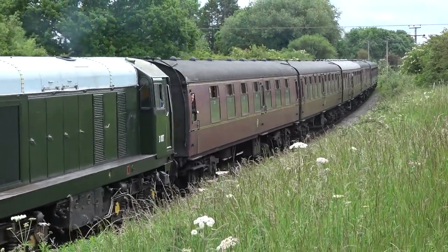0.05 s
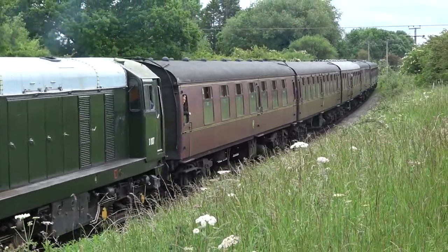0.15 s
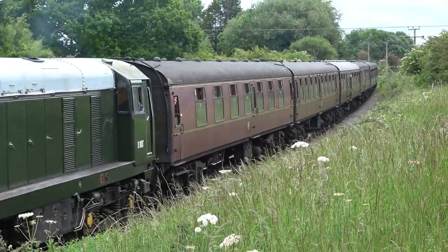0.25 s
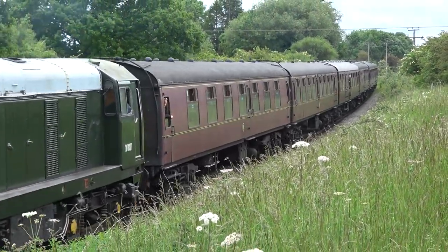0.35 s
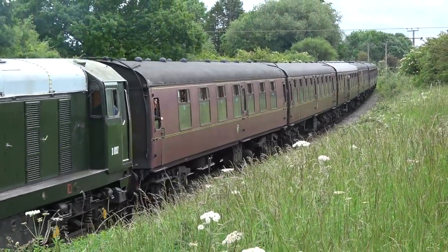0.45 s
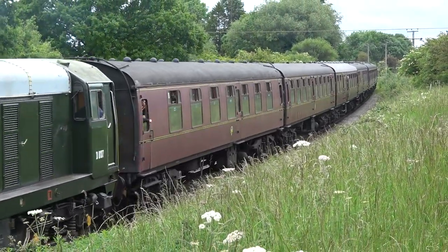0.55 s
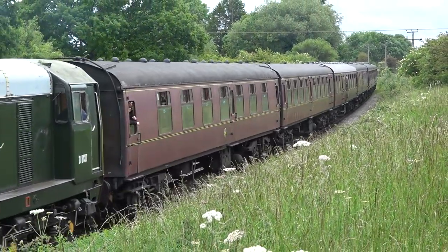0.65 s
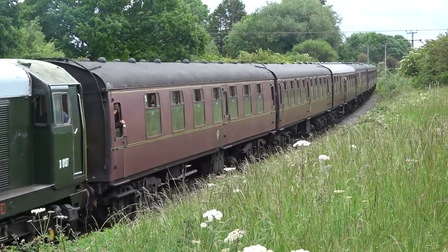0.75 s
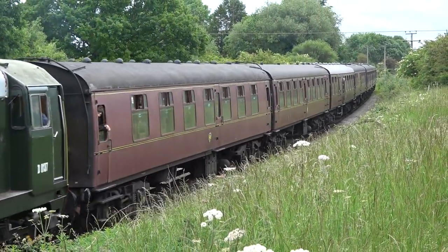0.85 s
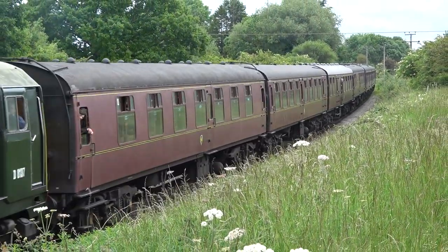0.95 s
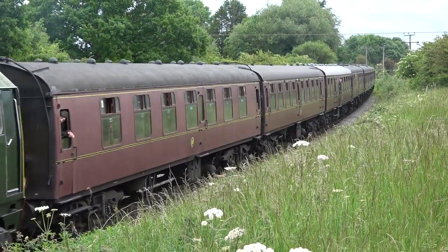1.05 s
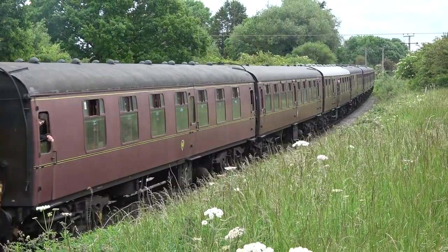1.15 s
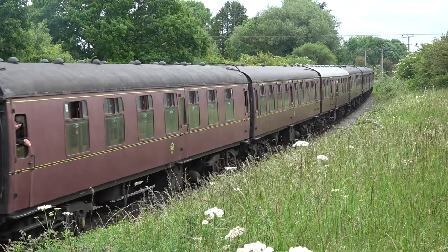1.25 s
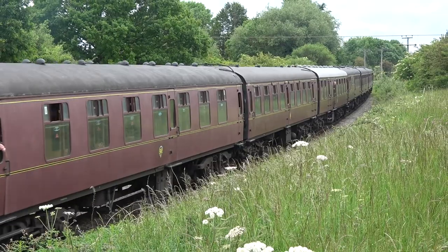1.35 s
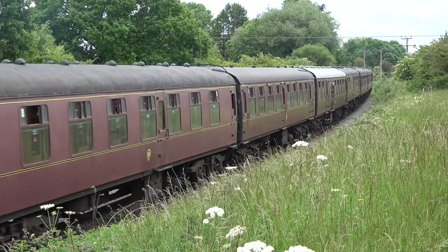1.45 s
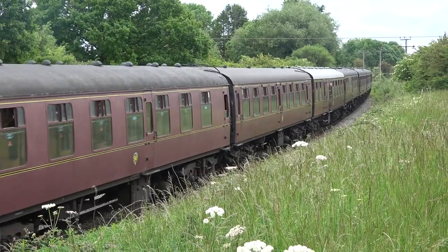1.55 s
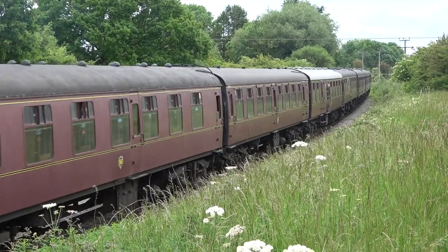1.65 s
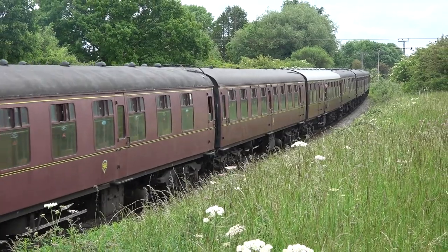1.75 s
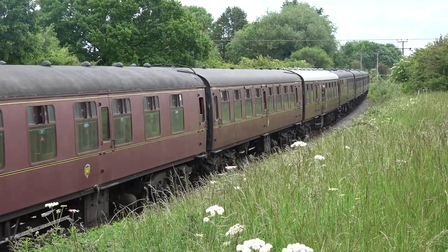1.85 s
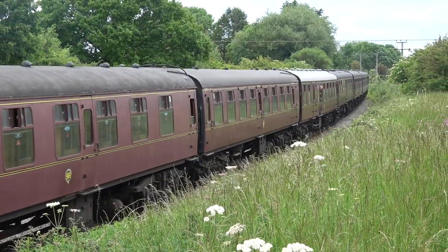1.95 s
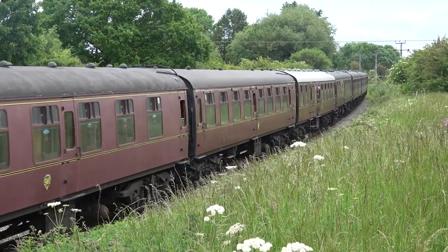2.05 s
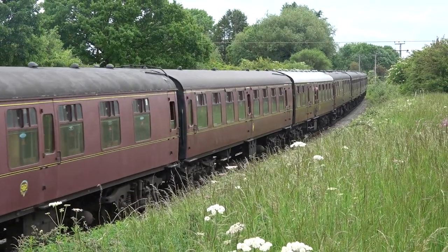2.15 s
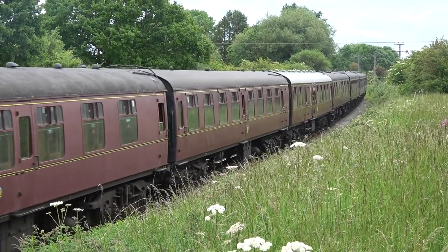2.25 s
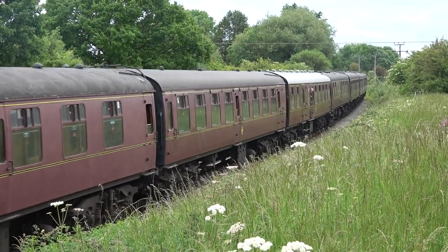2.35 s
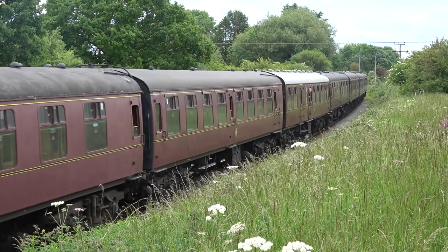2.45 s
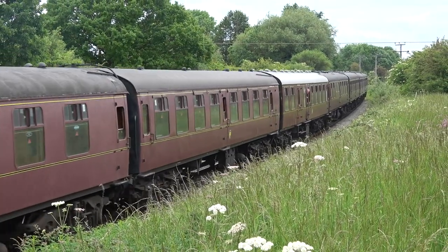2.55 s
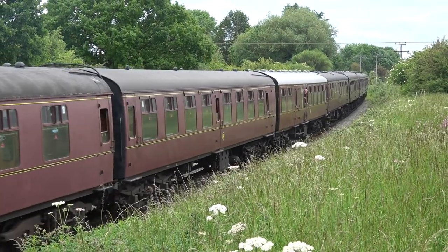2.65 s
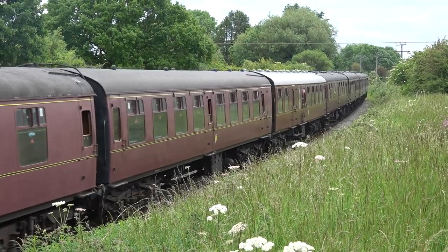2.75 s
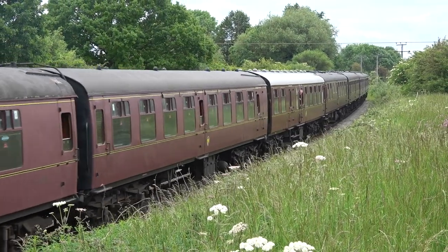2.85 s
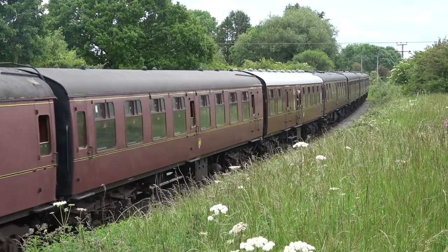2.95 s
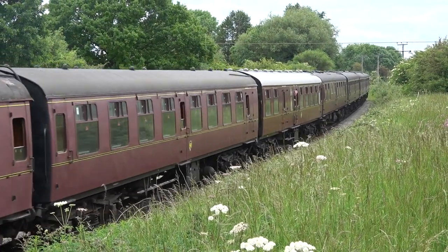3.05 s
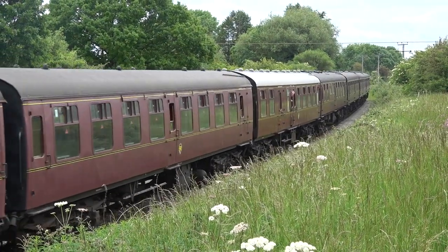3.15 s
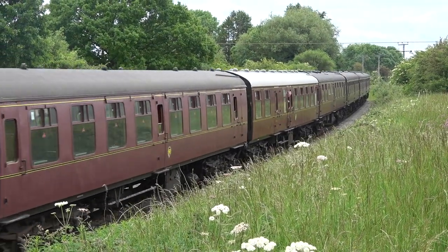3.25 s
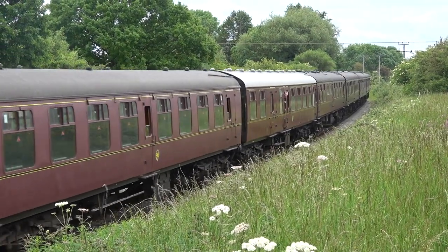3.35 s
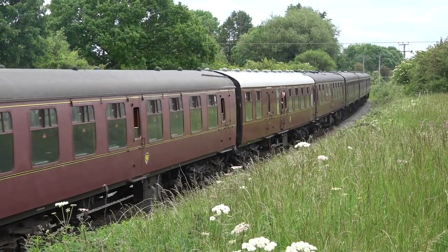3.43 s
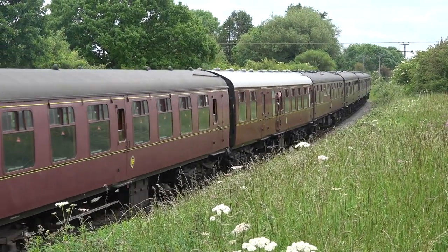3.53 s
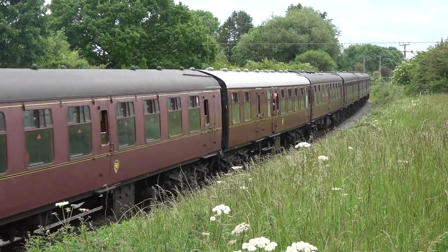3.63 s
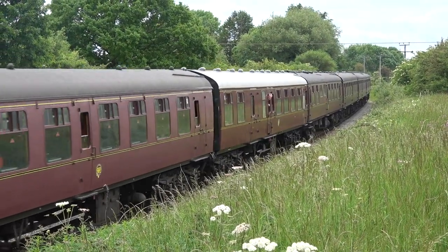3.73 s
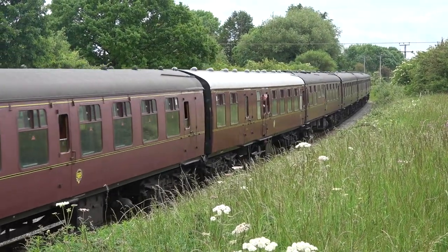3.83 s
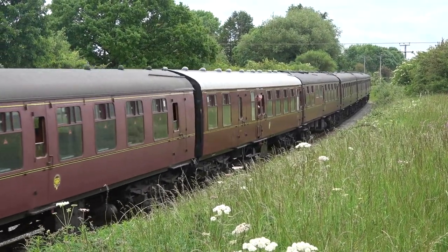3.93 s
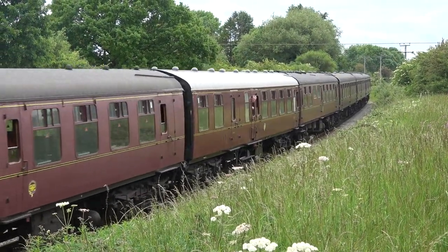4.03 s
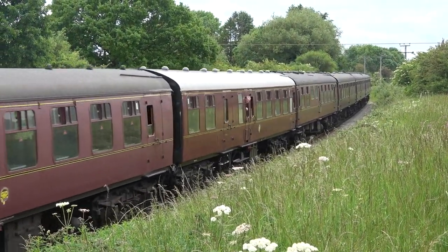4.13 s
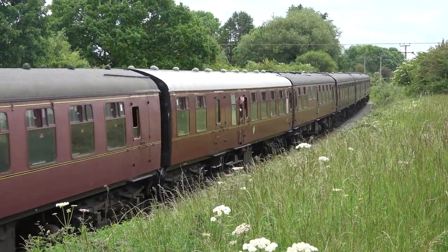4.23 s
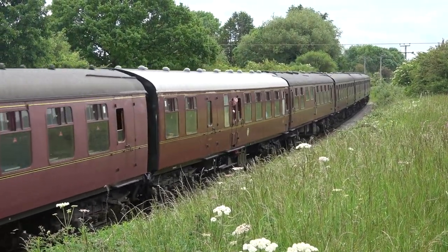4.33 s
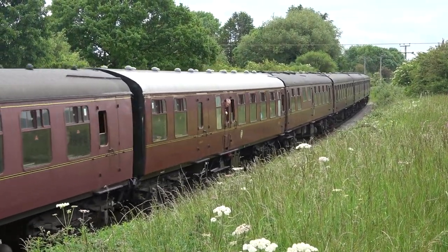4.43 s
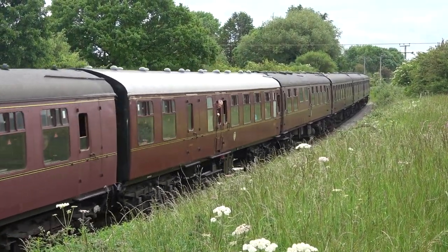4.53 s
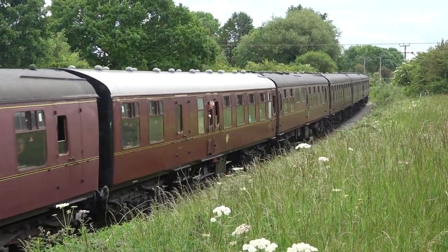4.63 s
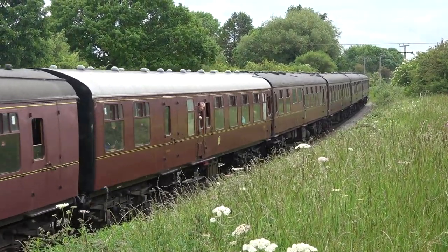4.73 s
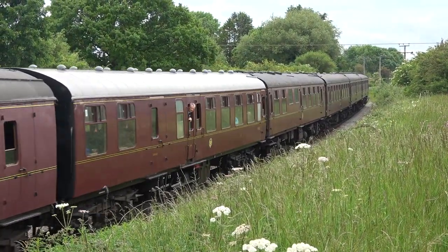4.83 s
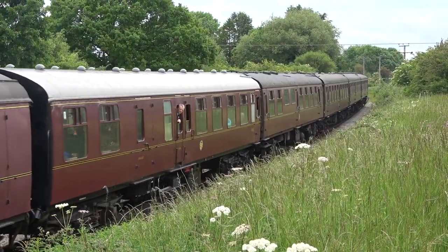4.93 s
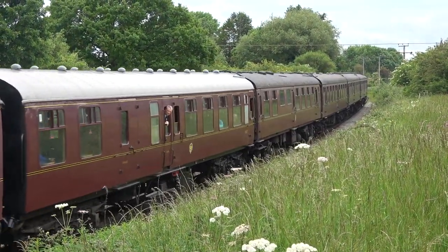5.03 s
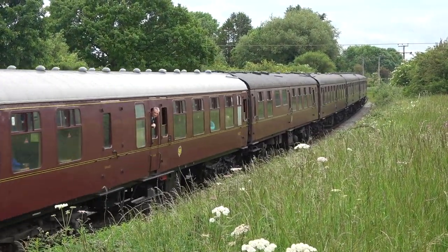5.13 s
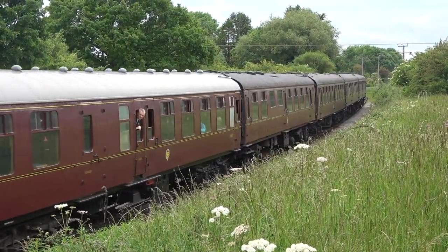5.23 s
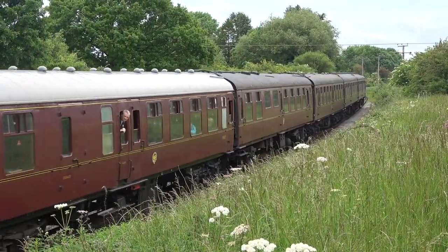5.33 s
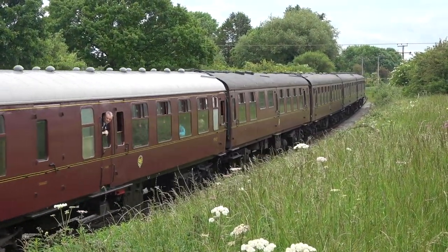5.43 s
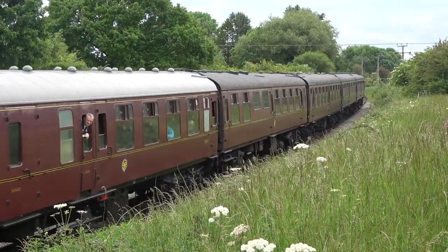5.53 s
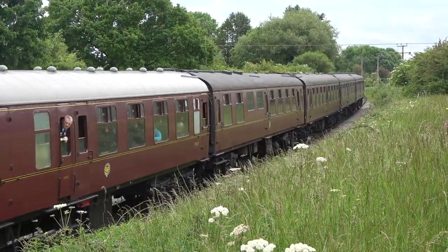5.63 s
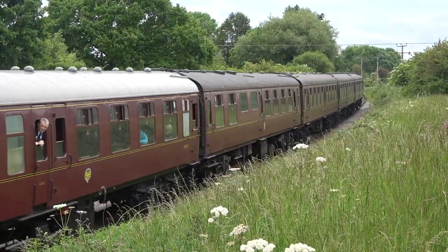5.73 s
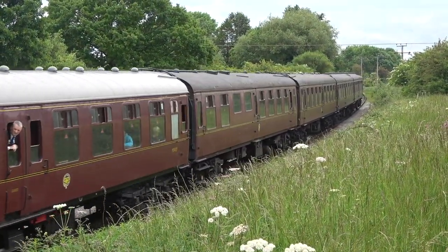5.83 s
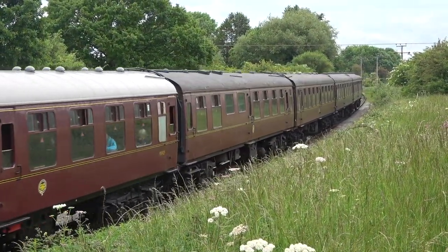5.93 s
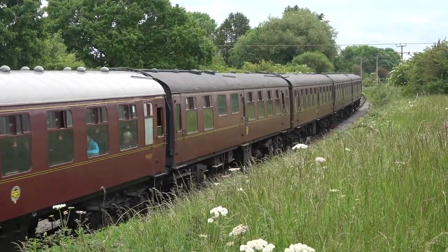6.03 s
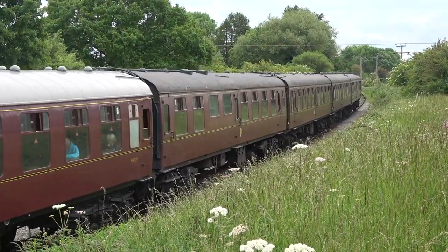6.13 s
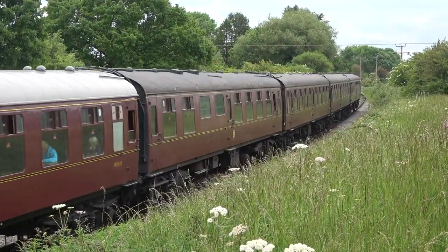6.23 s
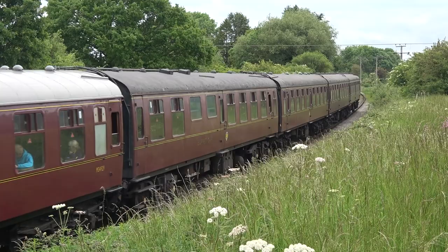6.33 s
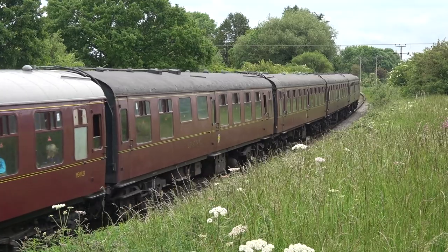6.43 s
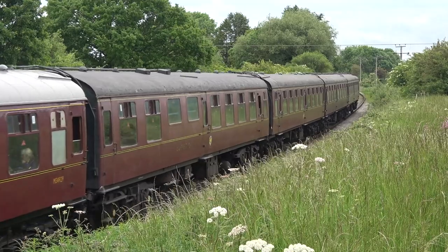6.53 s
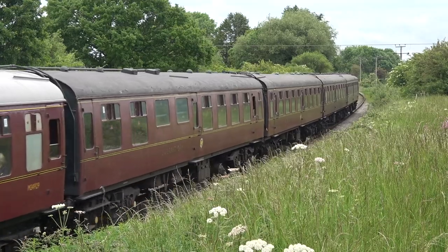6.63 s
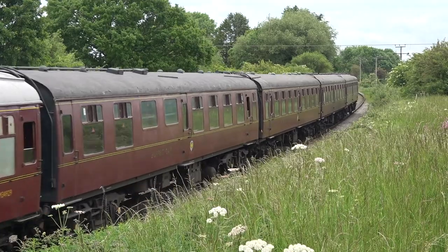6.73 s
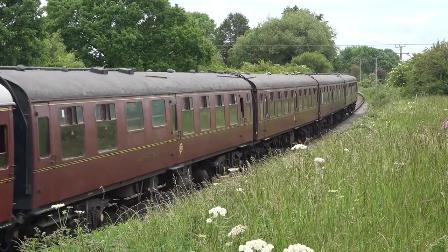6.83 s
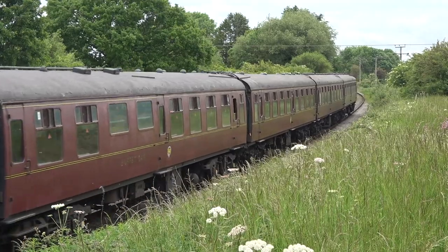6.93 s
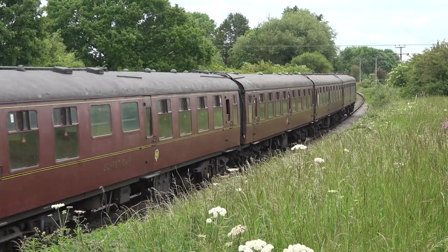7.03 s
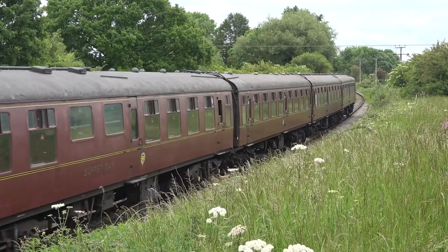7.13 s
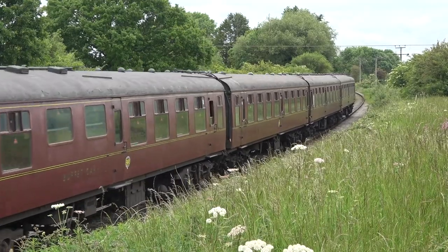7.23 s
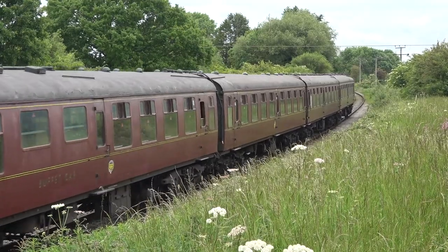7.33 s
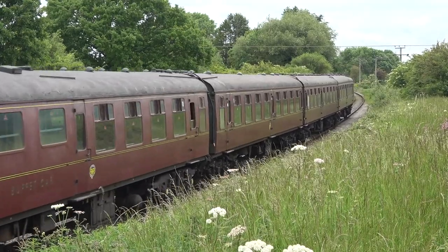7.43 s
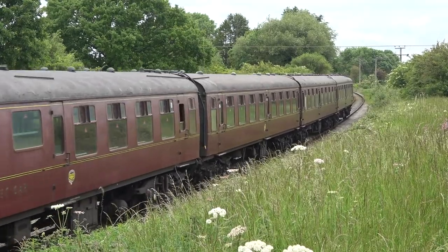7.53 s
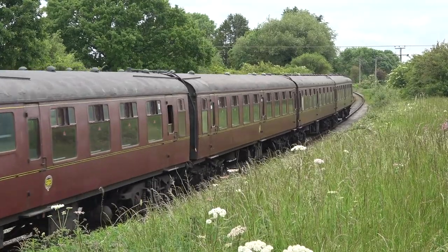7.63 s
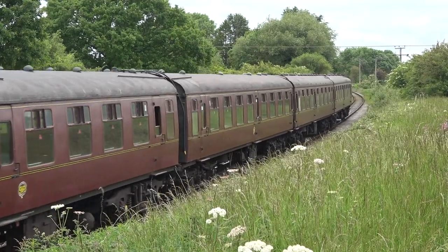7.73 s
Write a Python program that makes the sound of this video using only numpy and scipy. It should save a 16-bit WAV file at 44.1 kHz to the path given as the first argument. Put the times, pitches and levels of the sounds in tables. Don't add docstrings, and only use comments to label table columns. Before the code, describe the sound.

A diesel locomotive thunders past with rapid throbbing exhaust and a rising, fluttering turbo whistle, then fades as coaches clatter over rail joints with flange squeals.

```python
import sys
import numpy as np
from scipy import signal
from scipy.fft import rfft, irfft, next_fast_len
from scipy.io import wavfile
from scipy.ndimage import uniform_filter1d, minimum_filter1d, map_coordinates

SR = 44100
rng = np.random.default_rng(int(sys.argv[2]) if len(sys.argv) > 2 else 0)


def dump(signal):
    limited = np.clip(np.atleast_2d(signal).T, -1, 1)
    pcm = np.round(limited * 32767).astype(np.int16)
    wavfile.write(sys.argv[1], SR, pcm)


def elevation(decibels):
    levels = np.asarray(decibels, float)
    return 10 ** (levels / 20)


N = 342657
T = np.arange(N) / SR

# freq_hz, density_db [Hz, dB per Hz]
RAIL_SPECTRUM = [(13, -71), (22, -38), (54, -9), (141, -9.5), (184, -2), (212, -0.5), (336, -5.5),
                 (378, -9), (613, -26), (1730, -35), (2250, -35), (3310, -33.5), (7000, -56.5), (9100, -87),
                 (15400, -120)]
CLANK_SPECTRUM = [(500, 24.5), (1300, 5.5), (1800, 8.5), (2500, 7.5), (3100, 5), (5000, -5), (9000, -25),
                  (15000, -46)]
SCRAPE_SPECTRUM = [(5760, -32), (9800, -19), (11200, -15), (12100, -4), (12700, 0), (13300, -7),
                   (14200, -13), (15700, -21)]
BITE_SPECTRUM = [(5000, -18), (7000, -3), (9500, -7), (11200, 0), (12200, -1), (13500, -10), (15700, -26)]
BRIGHT_PUFF_SPECTRUM = [(3500, -42), (4500, 13), (7000, 3), (10000, 4), (12000, -19), (15800, -28)]
BLOCK_SPECTRUM = [(13, -47), (22, -6), (38, -37), (60, -11), (117, 1.5), (183, -6.5), (258, -15.5),
                  (375, -24), (600, -23), (780, -45), (1320, -120)]
ROAR_NEAR = [(210, -27), (330, -9), (385, -3), (512, -11), (621, -5.5), (755, -11.5), (943, -9),
             (3400, -14.5), (4400, -36), (7040, -120)]
ROAR_FAR = [(210, -18), (350, -1.5), (382, -1), (705, -11.5), (877, -8.5), (1330, -19), (1710, -12),
            (2400, -30), (3120, -63), (5280, -120)]
HISS_NEAR = [(2000, -34), (2800, 0), (3500, 1.5), (4500, -1), (5500, -3), (6500, -12), (8000, -4)]
HISS_FAR = [(1350, -21), (2300, -46), (2540, -13), (3120, 2.5), (3450, 3), (4770, -3), (5210, -7),
            (6500, -10), (8450, -37), (14300, -120)]
SIZZLE_NEAR = [(4500, -28), (6000, 6), (8500, 8.5), (10000, 2.5), (14000, -1.5), (15800, -9)]
SIZZLE_FAR = [(4500, -11), (6000, 1), (7500, 3), (8700, 12), (10500, 1), (13000, -11.5), (15800, -9)]

# [s, dB]
BOGIE_NEARNESS = [(3.4, -25), (3.53, -27), (3.76, -27), (4.12, -22), (4.45, -23), (4.59, -26), (4.97, -25),
                  (5.1, -27), (5.49, -27), (5.77, -26), (5.97, -22), (6.06, -21), (6.5, -24), (7.32, -27),
                  (7.48, -27), (7.77, -22)]
# [s, ratio]
COUPLINGS = [
    (4.019, 1.0),
    (5.879, 0.985),
    (7.712, 0.97),
]
# [s, dB, Hz]
AXLES = [
    (0, -1.5, 279),
    (0.239, -2, 243.3),
    (0.558, -3, 291),
    (0.797, -3, 323),
]
# [s, dB, Hz]
FAR_KNOCKS = [(3.714, -33, 228), (3.86, -9, 244), (4.17, -23, 253), (4.426, -4, 302), (4.609, -12, 246),
              (4.73, -6, 249), (5.04, -10.5, 275), (5.343, -12.5, 247), (5.554, -16, 193),
              (5.756, -11, 231), (5.844, -7, 230), (5.991, -10, 267), (6.139, -4.5, 233),
              (6.276, -8.5, 350), (6.46, -5.5, 249), (6.574, -9, 252), (6.711, -4.5, 270),
              (7.012, -12.5, 331), (7.384, -27, 184)]
# [s, s, dB]
RUBS = [
    (5.56, 0.28, -73),
    (6.95, 0.07, -66),
    (7.06, 0.073, -78),
    (7.228, 0.094, -60),
    (7.36, 0.09, -62),
    (7.464, 0.06, -59),
    (7.561, 0.081, -68),
    (7.695, 0.015, -57),
    (7.765, 0.01, -62),
]
# [s, s, Hz, dB]
SQUEALS = [
    (5.52, 5.9, 13300, -79),
    (7.03, 7.16, 12100, -72),
    (7.34, 7.66, 12700, -52.5),
    (7.53, 7.66, 14200, -72),
    (6.95, 7.04, 12800, -64),
    (7.23, 7.32, 12600, -61),
]
# [s, dB, s]
BRIGHT_PUFFS = [
    (5.864, -38, 0.009),
    (5.952, -45, 0.008),
    (5.78, -50, .008),
    (5.822, -50, .008),
]
# [s, dB, s]
BITES = [
    (6.8, -72, .04),
    (6.93, -70, .02),
    (7.27, -64, .04),
    (7.503, -53, .033),
    (7.7, -54, .012),
]

# [s, cycles]
GOVERNOR_LEAD = [(0.0, 0.055), (0.3, -0.064), (1.15, -0.108), (2.1, -0.04), (2.45, -0.04), (3.0, -0.157),
                 (3.55, -0.258), (3.9, -0.204), (4.55, -0.02), (5.1, 0.025), (6.0, -0.143), (6.6, -0.319),
                 (6.9, -0.265), (7.2, -0.285), (7.5, -0.239)]
# [s, cycles, cycles, dB]
ASPECT = [(0, 0.11, 0.348, -3.5), (1.4, 0.089, 0.315, -1.5), (2.9, 0.054, 0.331, -9),
          (3.25, 0.14, 0.205, 2), (3.6, 0.14, .18, -7.5), (7.77, 0.17, .18, -6.5)]
# near_thump_db, near_puff_db, far_thump_db, far_puff_db [dB each]
CYLINDERS = [
    (1, 0, -9, 0),
    (-1.6, 4, -13, 2),
    (-0.52, 1.5, -6, 1),
    (-1.6, 3, -5, 3),
]
MANIFOLD = [0.0, 0.117, 0.0574, 0.174]
# [Hz, Hz, dB]
PIPE_MODES = [(71.5, 4.4, -4), (88.6, 11.4, 5.5), (126, 36, 6.5), (184, 11.7, -0.5), (288, 180, 3.5),
              (696, 500, -7)]
# [s, dB]
ENGINE_STRENGTH = [(0, -15.5), (0.55, -16.5), (0.95, -15), (1.7, -13.5), (2.4, -15.5), (3.0, -16),
                   (3.3, -24.5), (3.65, -27), (4.2, -33.5), (5.4, -33.5), (6.0, -32.5), (7.2, -36.5),
                   (7.77, -41.5)]
# [s, dB]
HARD_FIRINGS = [(0.006, 2.8), (0.037, 1.4), (0.124, 1.8), (0.207, 1.0), (0.25, 2.3), (0.348, 2.5),
                (0.391, 2.3), (0.431, 4.2), (0.476, 2.4), (0.549, 0.8), (0.591, 2.4), (0.647, 0.9),
                (0.689, 1.0), (0.718, 2.4), (0.762, 3.2), (0.861, 1.7), (0.889, 0.8), (0.933, 4.3),
                (1.102, 2.1), (1.113, 0.8), (1.272, 4.7), (1.442, 5.6), (1.485, 3.3), (1.526, 1.0),
                (1.61, 3.0), (1.779, 4.2), (1.823, 2.2), (1.863, 3.3), (1.95, 4.5), (1.992, 5.1),
                (2.034, 3.6), (2.119, 3.5), (2.161, 4.4), (2.202, 3.1), (2.289, 3.8), (2.503, 1.5),
                (2.801, 4.8), (2.856, 3.3), (2.898, 3.0), (3.068, 1.7), (3.098, 2.1), (3.238, 2.2),
                (3.322, 3.9), (3.407, 1.2), (3.491, 3.1), (3.533, 1.1), (3.576, 3.6), (3.658, 6.1),
                (3.744, 3.0), (3.913, 1.2), (4.164, 2.2), (4.371, 1.0), (4.417, 0.8), (4.839, 1.6),
                (5.009, 1.1), (5.176, 1.6)]
# [s, dB]
FAR_PUFF = [(0, 1.5), (1.1, 1.5), (1.4, -2), (2.2, -2), (2.5, 4), (3.0, 5.5), (3.3, -2), (3.6, 1),
            (7.77, 0)]
# [s, 0-1]
TURNED_AWAY = [(0, 0.06), (2, 0.07), (2.6, 0.64), (3.6, 0.91), (5, 0.99), (7.77, 1)]
# [s, s, dB]
FLARES = [
    (1.95, 0.2, 5),
    (3.1, 0.23, 3.5),
]
# [s, s, dB]
ROAR_DRIFTS = [
    (2.15, .17, -3),
    (3.75, .25, 4.5),
    (5.25, .4, 2.5),
    (7.4, .4, -2),
]
# [s, Hz, 0-1]
GROUND_ECHO = [(2.2, 9000, 0), (2.42, 8040, 0), (2.7, 6800, 0.55), (3.1, 5700, 0.67), (3.55, 5460, 0.53),
               (4.0, 5200, 0.34)]
# [s, Hz, dB]
WHISTLE = [(0.0, 6390, -27), (0.2, 6630, -32.5), (0.45, 6920, -23), (1.0, 7330, -33), (1.6, 7850, -38),
           (2.18, 8470, -27), (2.42, 8390, -39.5), (2.9, 8570, -35), (3.25, 9000, -42), (3.6, 8950, -36.5),
           (4.0, 8970, -44.5), (4.6, 9170, -48), (5.4, 9000, -51), (5.85, 9060, -45.5), (6.2, 9120, -54.5),
           (6.75, 9270, -54), (7.3, 9400, -58), (7.77, 9420, -62)]
# [s, dB]
OVERTONE = [(0, -27), (1.2, -26), (1.7, -45), (7.77, -45)]
# [s, ratio, share]
SCATTER = [(0, .3, .009), (.9, .4, .01), (1.3, .75, .014), (2.1, .55, .013), (2.6, .8, .016),
           (4.5, .95, .02), (5.9, .8, .018), (6.3, .35, .014), (7.77, .5, .016)]

BANK_HZ = 23.55


def unit(x):
    return x / np.sqrt(np.mean(np.abs(x) ** 2) + 1e-20)


def curves(rows):
    s, *cols = np.transpose(rows)
    return [np.interp(T, s, c) for c in cols]


def swell(centre_s, half_s):
    return np.exp(-((T - centre_s) / half_s) ** 2)


def wobble(rate):
    return map_coordinates(rng.standard_normal(int(N * rate / SR) + 4), [T * rate], order=2)


def filtered(x, response):
    m = next_fast_len(N + SR // 2)
    return irfft(rfft(x, m) * response(np.fft.rfftfreq(m, 1 / SR)), m)[:N]


def coloured(x, spectrum):
    hz, db = np.transpose(spectrum)
    return unit(filtered(x, lambda f: elevation(np.interp(np.log(f + 1), np.log(hz), db, -120, -120))))


def noise(patchy_db):
    z = signal.stft(rng.standard_normal(N), nperseg=512)[2]
    field = uniform_filter1d(rng.standard_normal(z.shape), 6, 0)
    field = uniform_filter1d(field, 8, 1)
    return signal.istft(z * elevation(patchy_db * unit(field)), nperseg=512)[1][:N]


def rolling():
    fade = np.clip((T - 2.2) / 0.79, 0, 1)
    level_db = curves(BOGIE_NEARNESS)[0] + 1.5 + 0.97 * wobble(25)
    return fade * elevation(level_db) * coloured(noise(1.2), RAIL_SPECTRUM)


def joints():
    # clank_db, ring_db, t60_s, rise_s, first_bounce_db
    near = (-13.5, 10.5, .024, .0031, -10)
    far = (-23.5, 4, .055, .004, -15)
    drops = [(s + scale * later, db, hz, *near) for s, scale in COUPLINGS for later, db, hz in AXLES]
    drops = [row for row in drops if row[0] < N / SR]
    drops += [(*row, *far) for row in FAR_KNOCKS]

    thuds, shake, t = np.zeros(N + SR), np.zeros(N + SR), T[:SR // 4]
    rattle = 1.2 * elevation(-60 * t / 0.035) + 0.55 * elevation(-60 * t / 0.5)
    rattle *= 1 - np.exp(-t / 0.0003)
    for (s, db, hz, clank_db, ring_db, t60, rise, bounce_db), luck in zip(drops, rng.random((len(drops), 5))):
        at = round(s * SR)
        axlebox_hz = 395 * (1 + .06 * (luck[0] - .5))
        thud = -np.sin(2 * np.pi * hz * t) * elevation(-60 * t / t60)
        thud += np.sin(2 * np.pi * axlebox_hz * t) * elevation(-15 - 60 * t / .045)
        thud *= elevation(db + ring_db) * (1 - np.exp(-(t / rise) ** 2))
        thuds[at:at + len(t)] += thud
        for bounce, u in enumerate(luck):
            echo = at + round((.012 * (bounce + 1) + 0.00637 * u) * SR)
            thuds[echo:echo + len(t)] += elevation(bounce_db - 1.5 * bounce) * thud
        shake[at:at + len(t)] += elevation(db + clank_db + 2) * rattle
    return thuds[:N] + elevation(-42) * coloured(shake[:N] * noise(1.5), CLANK_SPECTRUM)


def flanges():
    grip_s, let_go_s = 0.027, 0.07

    def rub(s, hold):
        attack = np.clip((T - s) / grip_s + 1, 0, 1) ** 2
        return attack * np.exp(-np.maximum(T - s - hold, 0) / let_go_s * 2)

    def arch(start, end):
        return np.sin(np.pi * np.clip((T - start) / (end - start), 0, 1)).clip(0) ** .5

    level = sum(elevation(db) * rub(s, hold) for s, hold, db in RUBS)
    scrape = level * elevation(3.0 + 1.7 * wobble(52)) * coloured(noise(1.8), SCRAPE_SPECTRUM)
    wander = np.cumsum(230 * wobble(260)) / SR
    squeal = sum(elevation(db) * arch(start, end) * np.sin(2 * np.pi * (hz * T + wander))
                 for start, end, hz, db in SQUEALS)
    squeal = squeal * elevation(3.5 * wobble(60))
    bright_puff = sum(elevation(db) * swell(s, half) for s, db, half in BRIGHT_PUFFS) * coloured(noise(0.83), BRIGHT_PUFF_SPECTRUM)
    bite = sum(elevation(db) * swell(s, half) for s, db, half in BITES) * coloured(noise(1.5), BITE_SPECTRUM)
    return bite + scrape + squeal + bright_puff


def ground(x):
    dip_hz, share = curves(GROUND_ECHO)
    share = np.clip(share, 0, 1)
    echo = map_coordinates(x, [np.arange(N) - SR / (2 * dip_hz)], order=1)
    return (x + share * echo) / np.hypot(1, share)


def block():
    memory, evenness = 0.88, 0.8
    turn = np.exp(-2j * np.pi * np.fft.rfftfreq(N, 1 / SR) * len(CYLINDERS) / BANK_HZ)
    rumble = coloured(irfft(rfft(noise(1.0)) / (1 - memory * turn), N), BLOCK_SPECTRUM)
    size = np.sqrt(np.abs(uniform_filter1d(rumble ** 2, size=SR // 40)) + .02)
    return np.interp(T + curves(GOVERNOR_LEAD)[0] / BANK_HZ, T, unit(rumble / size ** evenness))


def bank_phases():
    near = BANK_HZ * T + curves(GOVERNOR_LEAD)[0] - .62
    return near, near - curves(ASPECT)[1]


def beats(cycles, pattern_db, scatter_db, rise, fall):
    size = elevation(np.asarray(pattern_db)[np.arange(256) % 4] + scatter_db * rng.standard_normal(256))
    phase = cycles % 1
    swells = np.exp(-phase / fall) * (1 - np.exp(-(phase / rise) ** 2))
    return size[np.floor(cycles).astype(int) % 256] * swells


def thumps():
    near, far = bank_phases()
    near_db, _, far_db, _ = np.transpose(CYLINDERS)

    def unsteady():
        return .01 * wobble(18)

    def pipe(f):
        return sum(elevation(db) * 1j * f * w / (c * c - f * f + 1j * f * w) for c, w, db in PIPE_MODES)

    near_kicks = beats(near + unsteady(), near_db, scatter_db=0.0, rise=0.045, fall=0.02)
    detour = np.asarray(MANIFOLD)[np.floor(far).astype(int) % 4]
    far_kicks = beats(far - detour + unsteady() / 2, far_db, scatter_db=5.5, rise=0.056, fall=0.026)
    far_kicks *= elevation(curves(ASPECT)[2])
    rung = filtered(near_kicks, pipe) + filtered(far_kicks, lambda f: pipe(1.118 * f))
    return unit(rung) + 1.05 * block()


def turned_away():
    return np.clip(curves(TURNED_AWAY)[0], 0, 1)


def hard_firings():
    s, db = np.transpose(HARD_FIRINGS)
    bump = np.exp(-((T[:2001] - T[1000]) / .008) ** 2)
    return 1.4 * signal.fftconvolve(np.bincount((s * SR).astype(int), db, N), bump, "same")


def puffs(bias_db, fall=.095, follow=1):
    near, far = bank_phases()
    late, _, far_db = curves(ASPECT)
    _, near_puff, _, far_puff = np.transpose(CYLINDERS)
    hard_db = follow * hard_firings()
    far_db = far_db + curves(FAR_PUFF)[0] + bias_db * (2.5 - turned_away())
    near_gas = elevation(hard_db) * beats(near - late, near_puff, 2, .14, fall)
    far_gas = elevation(hard_db + far_db) * beats(far - late, far_puff, 2, .14, fall)
    return unit(near_gas + far_gas)


def jet(steady, bias_db, close, distant, fall=.09, follow=1):
    away = turned_away()
    gas = (puffs(bias_db, fall, follow) + steady) * noise(1.8)
    return np.sqrt(1 - away) * coloured(gas, close) + np.sqrt(away) * coloured(gas, distant)


def exhaust():
    away = turned_away()
    view_db = uniform_filter1d(curves(WHISTLE)[1] + 30, size=SR // 2)
    roar_db = -26 + 0.66 * (curves(ENGINE_STRENGTH)[0] + 16.5) - 6.0 * away
    roar_db += 4.5 * swell(2.75, 0.19)
    roar_db += sum(db * swell(s, half) for s, half, db in ROAR_DRIFTS)
    hiss_db = -36 + 0.64 * view_db + 11 * swell(3.3, 0.95)
    sizzle_db = -41.5 + 0.82 * view_db
    sizzle_db += sum(db * swell(s, half) for s, half, db in FLARES)

    gas = elevation(roar_db) * jet(1.1 + .6 * away, -3.4, ROAR_NEAR, ROAR_FAR, follow=.35)
    gas += elevation(hiss_db) * jet(0.88 + 0.27 * away, 1.7, HISS_NEAR, HISS_FAR)
    gas += elevation(sizzle_db) * jet(.55 + .7 * away ** 2, 0, SIZZLE_NEAR, SIZZLE_FAR, fall=.06, follow=.75)
    return ground(gas)


def whistle():
    gas = puffs(0.5)
    hz, db = curves(WHISTLE)
    skirt, sag = curves(SCATTER)

    def blower(pitch, skirt):
        turn = 2 * np.pi * np.cumsum(pitch * (1 + sag * (1.2 - np.minimum(gas, 2.5)))) / SR
        flutter = lambda: wobble(330) + skirt * wobble(1300)
        return (np.sin(turn) * flutter() + np.cos(turn) * flutter()) / np.hypot(1, skirt)

    tone = blower(hz, skirt) + elevation(-13) * blower(hz * 0.965, skirt)
    tone += elevation(curves(OVERTONE)[0]) * blower(2 * hz, 1.5)
    steady = np.interp(T, [0, 2.5, 3.5, 6.5], [1.0, 1.0, .75, 1.2])
    return elevation(db) * unit((gas + steady) * tone / (1 + steady))


def locomotive():
    return elevation(curves(ENGINE_STRENGTH)[0] - 4.0) * thumps() + exhaust() + whistle()


def scene():
    return (rolling() + joints() + flanges() + locomotive())[None]


def low_pass(x):
    return signal.sosfilt(signal.butter(12, 15810, fs=SR, output="sos"), x)


def record(dry):
    cut = lambda f: ((1j * f) ** 2 / (62 ** 2 - f * f + 1j * f * 85)) * (f < 15800)
    mic = filtered(dry[0], cut)
    need = np.minimum(1, 0.53 / (np.abs(mic) + 1e-9))
    gain = uniform_filter1d(minimum_filter1d(need, size=89), size=45)
    return low_pass((mic * gain)[None])


dry = scene()
out = record(dry)
dump(out)
```